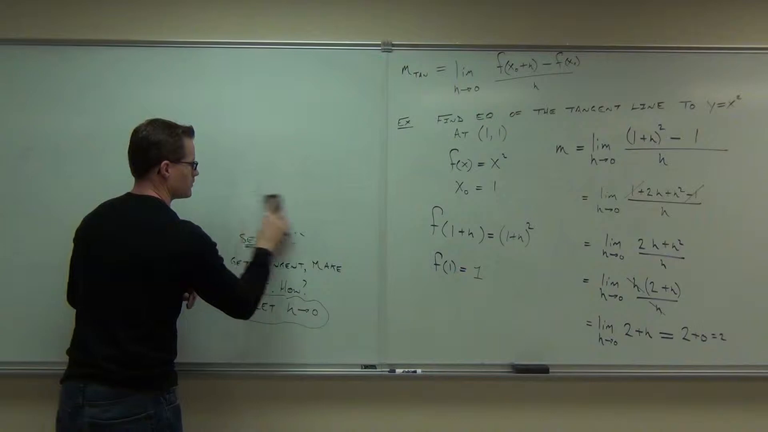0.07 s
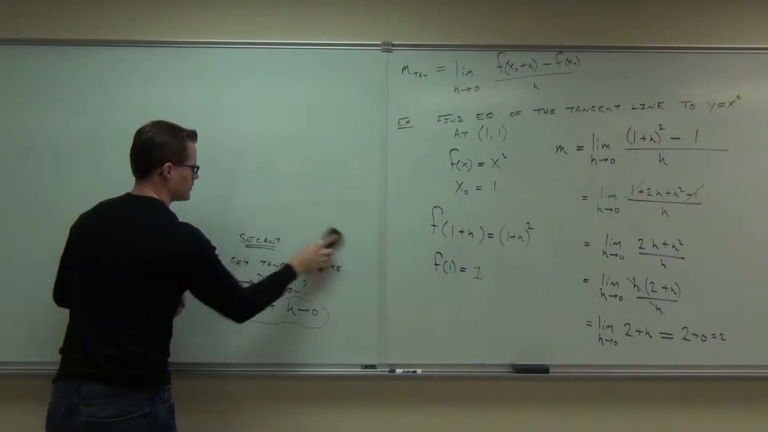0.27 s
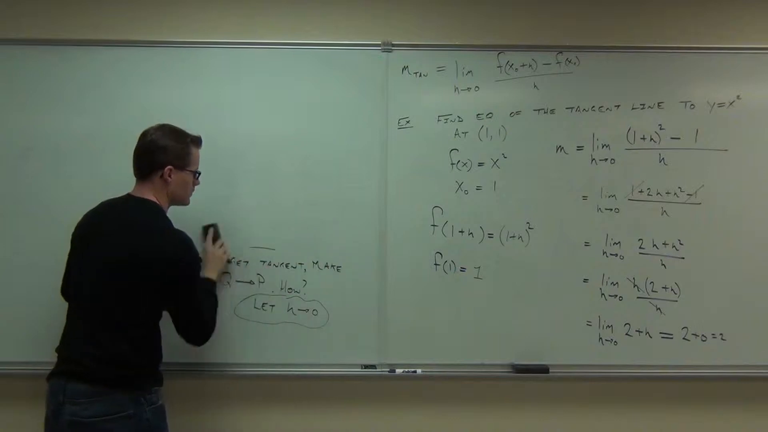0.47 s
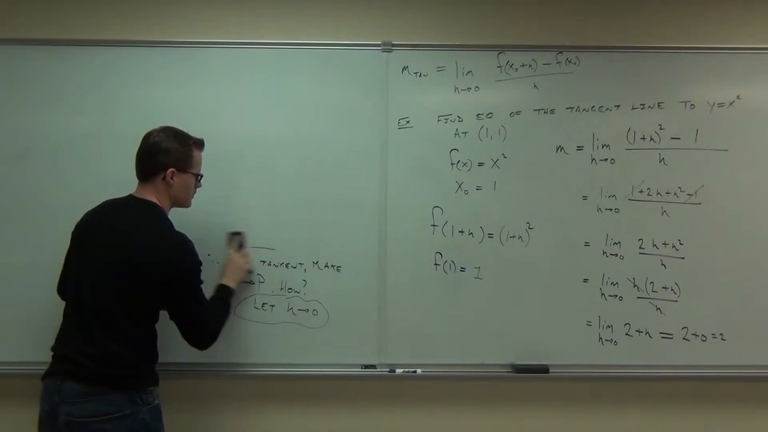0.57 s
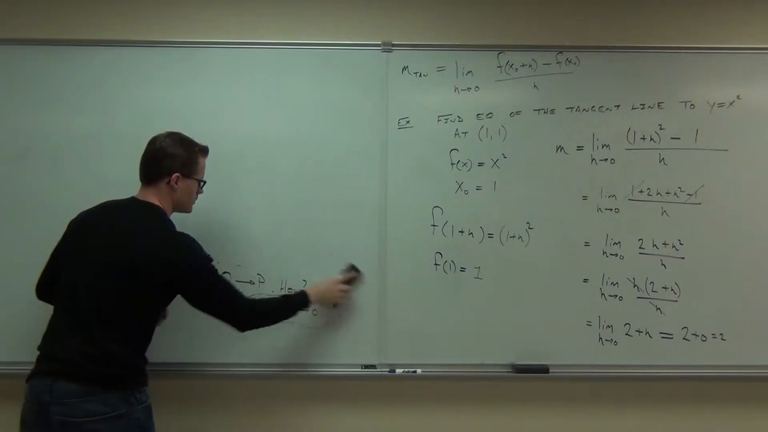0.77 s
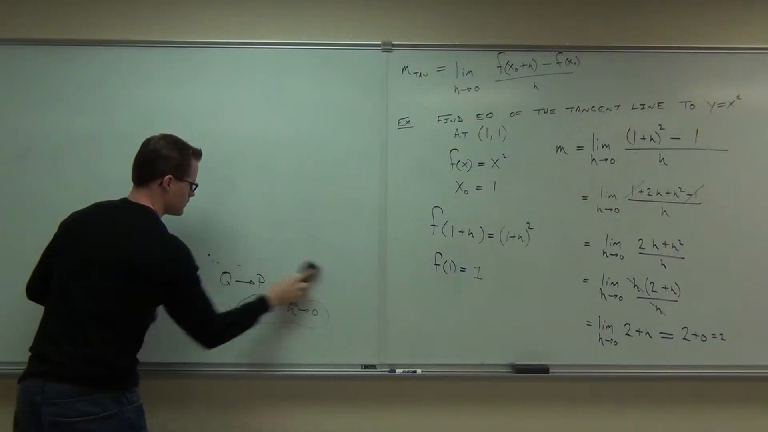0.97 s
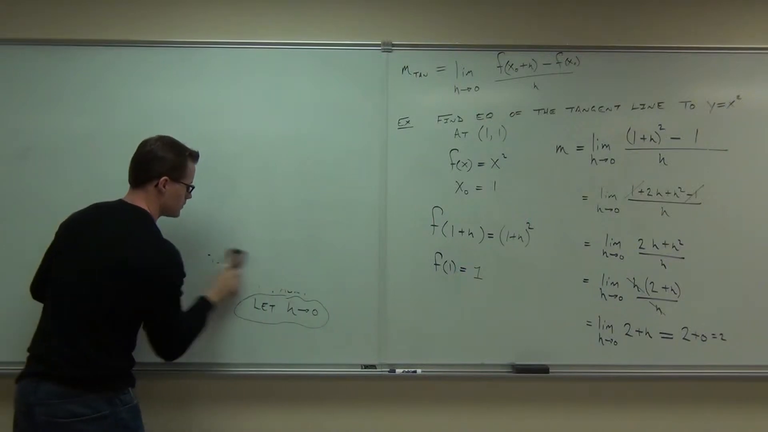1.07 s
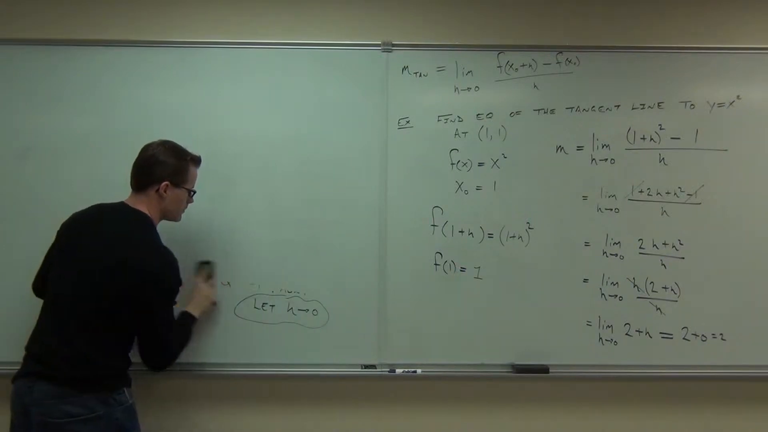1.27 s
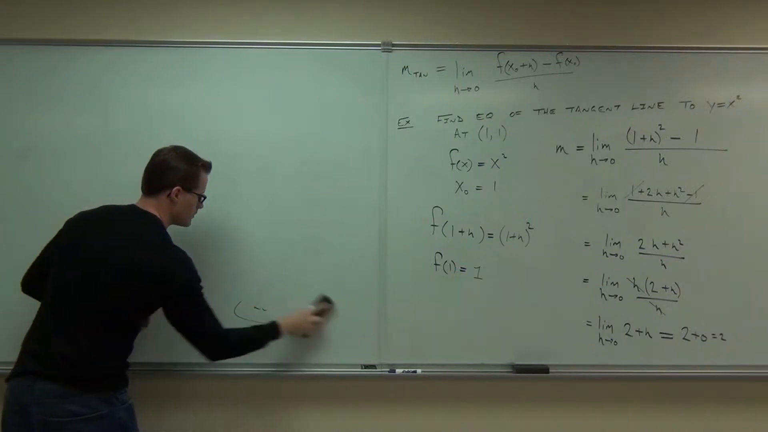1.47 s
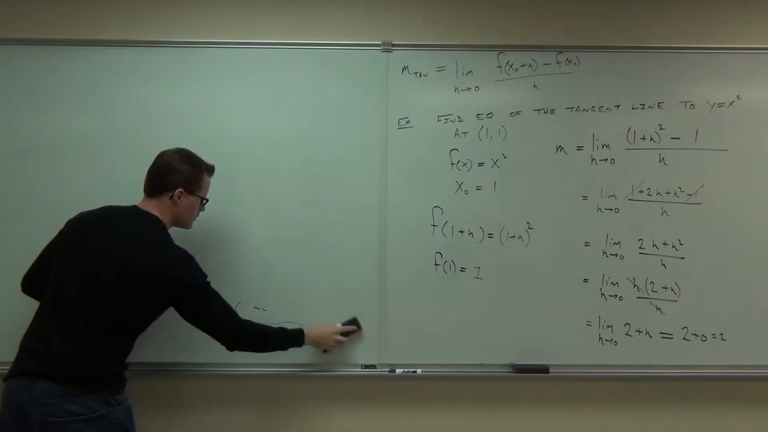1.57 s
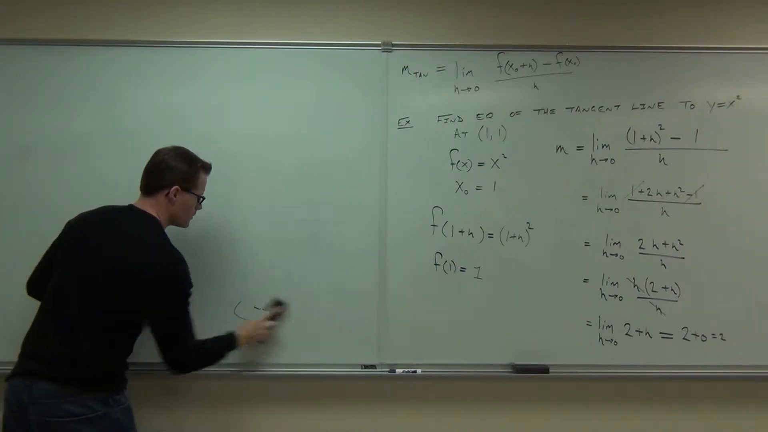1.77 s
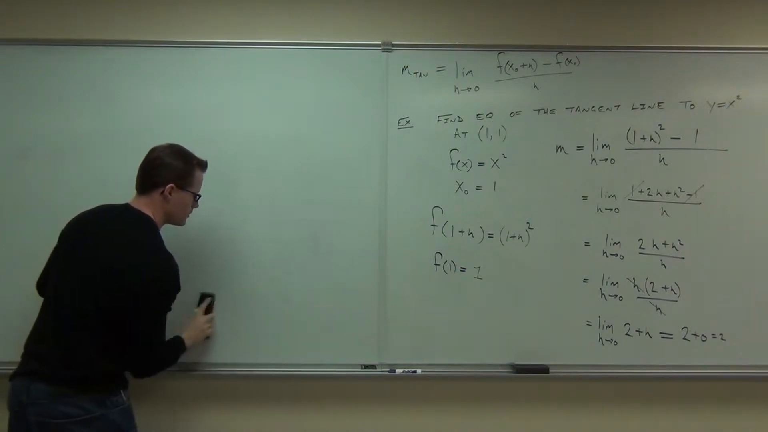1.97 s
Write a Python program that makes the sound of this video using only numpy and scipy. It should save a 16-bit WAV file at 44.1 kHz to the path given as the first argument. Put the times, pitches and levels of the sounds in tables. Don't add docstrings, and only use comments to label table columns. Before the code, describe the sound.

Out of brief silence come a low room hum and hissing whiteboard eraser strokes, with dull, faint board thuds and a small tick, then a rapid metallic clatter on the marker tray, heard across a mildly reverberant classroom.

```python
import sys
import numpy as np
from scipy import signal
from scipy.io import wavfile
from scipy.ndimage import uniform_filter1d

SR = 44100
rng = np.random.default_rng(int(sys.argv[2]) if len(sys.argv) > 2 else 0)


def digitize_waveform(pressure):
    field = np.atleast_2d(pressure).T
    bounded = np.clip(field, -1, 1)
    quanta = np.round(bounded * 32767).astype(np.int16)
    wavfile.write(sys.argv[1], SR, quanta)


def voltage_ratio(level):
    return 10 ** (np.asarray(level, float) / 20)


N = 89170

# (f/Hz, density/dB)
AIR_SPECTRUM = [(20, -33), (45, 3), (160, 5), (300, -2), (950, -9), (1150, -11.5), (9000, -20.5),
                (15800, -30)]
# (f/Hz, width/Hz, level/dB)
DUCT_HUMS = [(51, 27, -54), (86.4, 15, -59.5), (213.2, 28, -53.5), (284, 75, -62), (600, 34, -65.5),
             (922, 23, -63)]
# (t/s, level/dB)
DRONE_SWELLS = [(0.06, -63), (0.13, -41), (0.222, -56.5), (0.534, -44), (0.704, -54), (1.008, -42),
                (1.2, -48), (1.276, -41.5), (1.304, -50), (1.702, -43.5), (1.74, -51), (1.768, -86),
                (1.976, -60), (2.02, -44)]
# (f/Hz, correlation/1)
LIKENESS = [(60, .9995), (180, .998), (330, .985), (640, .9), (1500, .72), (3500, .81), (15000, .87)]
# (f/Hz, level/dB)
SIDE_LEVEL = [(150, 0), (400, .4), (1000, 1.2), (2500, 2), (15000, 2)]
# (f/Hz, phase/rad)
SIDE_PHASE = [(60, 0), (450, 0), (950, -.15), (2150, -.1), (11400, .2), (15500, .1)]
# (f/Hz, width/Hz, level/dB)
TRAY_MODES = [(673, 40, -3), (931, 35, -1), (1140, 35, -1), (1340, 45, -1), (1650, 45, -9), (1990, 65, -1),
              (2240, 45, -4), (2750, 150, -4), (3400, 300, -5)]
# (t/s, peak level/dB, struck region f/Hz, chatter/s)
TRAY_BUMPS = [(1.8925, -28.5, 1170, 0.001), (1.899, -33.5, 770, 0.008), (1.907, -41, 700, 0.0043),
              (1.933, -32, 785, 0.017), (1.945, -30.5, 1940, 0.0035), (1.951, -27.5, 980, 0.0052),
              (1.957, -29, 1380, 0.0087), (1.961, -28, 1840, 0.005), (1.966, -28, 1040, 0.0067),
              (1.969, -26.5, 940, 0.013), (1.977, -24, 1000, .005), (1.979, -26.5, 1950, 0.0053),
              (1.986, -28, 1370, .004), (1.992, -27, 1180, .008), (2.004, -28.5, 1280, 0.005),
              (2.01, -27.5, 1620, .005), (2.015, -25.5, 770, .006)]
# (t/s, level/dB, f/Hz, length/s, width/Hz)
PANEL_KNOCKS = [(0.058, -65, 2660, 0.018, 420), (0.258, -71.5, 3120, 0.014, 403),
                (0.276, -58, 600, 0.061, 150), (.71, -53.5, 385, 0.057, 149),
                (0.752, -69.5, 990, 0.0095, 304), (.755, -51, 596, 0.021, 102),
                (0.756, -64.5, 1980, 0.017, 253), (0.769, -57.5, 346, 0.026, 152),
                (0.804, -60, 330, .03, 200), (1.203, -62, 2210, 0.012, 910), (1.4, -56, 297, 0.038, 120),
                (1.643, -52, 600, 0.035, 267), (1.747, -52, 244, 0.056, 40.6), (.89, -56, 171, 0.034, 50),
                (1.62, -48, 184, 0.073, 61)]
# (t/s, peak level/dB, centre f/Hz)
TICKS = [
    (1.2045, -32, 6500),
    (1.361, -38, 3000),
    (1.8928, -33, 2000),
    (1.9305, -32, 2500),
]
# (f/Hz, width/Hz, level/dB)
PANEL_MODES = [(450, 250, -6), (800, 350, -3), (1100, 400, -3), (1700, 700, -4), (2500, 1000, -5),
               (3600, 1400, -10)]
# (middle t/s, half length/s, level/dB)
HAND_LEANS = [
    (0.345, 0.077, -70),
    (0.628, 0.052, -48),
    (0.767, 0.099, -51.5),
    (0.998, 0.14, -53),
    (1.266, 0.13, -48),
    (1.486, .12, -45.5),
    (1.676, 0.035, -61),
    (1.858, 0.18, -51.5),
]
# (start t/s, end t/s, top level/dB, place of top speed/1)
STROKES = [
    (0, 0.318, -46, 0.47),
    (0.28, 0.548, -46, 0.28),
    (0.492, 0.909, -44, 0.58),
    (0.9, 1.25, -43.5, 0.29),
    (1.222, 1.658, -40.5, 0.57),
    (1.649, 1.983, -41.5, 0.43),
    (1.948, 2.2, -46.5, 0.62),
]
# (f/Hz, density/dB)
FELT_SPECTRUM = [(880, -32), (1500, -12.5), (2410, -10), (2790, -10), (4060, -8.5), (6510, -3),
                 (11400, -1.5), (13500, -3), (15800, -12.5)]
# (t/s, f/Hz)
SHEEN_PATH = [(0, 11700), (.8, 11700), (1.1, 10900), (1.5, 10400), (2.02, 10400)]

DRONE_HZ, DRONE_WANDER_HZ, DRONE_TRIM_DB, AIR_DB = 120, 6.82, -4.5, -47
ROOM_T60_S, ROOM_DB, ROOM_MONO_HZ = .5, -5.5, 453
TRAY_DAMP, TRAY_SKIRT_HZ, TRAY_LEAN_DB = 3, 700, 2.5
REGION_DB_PER_OCT2, BUMP_RISE_S = -8.0, .0008
KNOCK_RISE_S, PANEL_LEAN_DB = 0.0013, .6
ARCH_POWER, TURN_LEVEL, TILT_DB = 0.9, .25, 4.5
HISS_PATCH_DB, SHEEN_DB, SHEEN_WIDTH_HZ = .5, 2, 3200
SHUT_S, FADE_S, FADE_POWER = 0.034, 0.04, 3.3


def evened(x):
    return x / np.sqrt(np.mean(x ** 2) + 1e-20)


def read(points, hz):
    f, value = np.transpose(points)
    return np.interp(np.log(hz + 1), np.log(f + 1), value)


def add(mix, s, sound):
    part = mix[round(s * SR):][:len(sound)]
    part += sound[:len(part)]


def resonate(x, hz, width):
    turn = np.exp(2j * np.pi * hz * np.arange(x.shape[-1]) / SR)
    r = np.exp(-np.pi * width / SR)
    return 2 * (turn * signal.lfilter([1 - r], [1, -r], x / turn)).real


def mode(x, hz, width, skirt):
    return resonate(resonate(x, hz, width), hz, skirt)


def noise(gain, size, patchy_db):
    hop = size // 4
    frames, hz = N // hop + 5, np.fft.rfftfreq(size, 1 / SR)
    a, b, c, d, patch = rng.standard_normal((frames, len(hz), 5)).T
    patch = uniform_filter1d(patch, size // 80, 0)
    patch = evened(uniform_filter1d(patch, 3000 // hop, 1))
    same = read(LIKENESS, hz)[:, None]
    left, other = a + 1j * b, c + 1j * d
    side = (voltage_ratio(read(SIDE_LEVEL, hz) / 2) * np.exp(.5j * read(SIDE_PHASE, hz)))[:, None]
    z = np.array([left * side, (same * left + np.sqrt(1 - same ** 2) * other) / side])
    z = z * voltage_ratio(patchy_db * patch) * gain(hz[:, None], np.arange(frames) * hop / SR)
    return signal.istft(z, nperseg=size, noverlap=size - hop)[1][:, :N]


def ventilation():
    air = noise(lambda hz, t: voltage_ratio(read(AIR_SPECTRUM, hz)), size=2048, patchy_db=-1.1)
    white = rng.standard_normal((len(DUCT_HUMS) + 1, N))
    hum = sum(voltage_ratio(db) * evened(mode(x, hz, w, 3 * w)) for x, (hz, w, db) in zip(white, DUCT_HUMS))
    wander = uniform_filter1d(uniform_filter1d(white[-1], 1500), 1500)
    drone_hz = DRONE_HZ + DRONE_WANDER_HZ * evened(wander)
    level = voltage_ratio(np.interp(np.arange(N) / SR, *np.transpose(DRONE_SWELLS)) + DRONE_TRIM_DB)
    drone = level * np.sqrt(2) * np.sin(2 * np.pi * np.cumsum(drone_hz) / SR)
    return voltage_ratio(AIR_DB) * evened(air) + hum + drone


def classroom(x):
    length = SR // 2
    taps = np.zeros((2, length))
    at = np.arange(200, length - 20, 20) + rng.integers(0, 20, (2, (length - 201) // 20))
    np.put_along_axis(taps, at, rng.choice([-1., 1.], at.shape), 1)
    taps = taps * voltage_ratio(-60 * np.arange(length) / SR / ROOM_T60_S)
    return voltage_ratio(ROOM_DB) * signal.fftconvolve(x[None], taps / np.linalg.norm(taps[0]), axes=1)[:, :N]


def tray():
    out, t = np.zeros(N), np.arange(5000) / SR
    for (s, db, region_hz, length), x in zip(TRAY_BUMPS, rng.standard_normal((len(TRAY_BUMPS), 5000))):
        drive = x * np.exp(-t / length) * np.minimum(t / BUMP_RISE_S, 1)
        ring = 0
        for hz, w, mode_db in TRAY_MODES:
            coupling_db = mode_db + REGION_DB_PER_OCT2 * np.log2(hz / region_hz) ** 2
            ring = ring + voltage_ratio(coupling_db) / np.sqrt(w) * mode(drive, hz, TRAY_DAMP * w, TRAY_SKIRT_HZ)
        add(out, s, voltage_ratio(db) * ring / np.abs(ring).max())
    return out


def knocks():
    out, t = np.zeros(N), np.arange(4000) / SR
    for (s, db, hz, length, w), x in zip(PANEL_KNOCKS, rng.standard_normal((len(PANEL_KNOCKS), 4000))):
        drive = x * np.minimum(t / KNOCK_RISE_S, 1) * np.exp(-(t / length) ** 4)
        ring = evened(mode(drive, hz, w, 2 * w))
        add(out, s, voltage_ratio(db) * ring * np.sqrt(len(t) / SR / length))
    for s, db, hz in TICKS:
        cycles = t[:300] * hz
        add(out, s, voltage_ratio(db) * 16 * cycles * np.exp(-3.0 * cycles) * np.sin(2 * np.pi * cycles))
    return out


def speed(t):
    out = np.zeros(len(t))
    for start, end, db, top in STROKES:
        skew = np.log(.5) / np.log(np.clip(top, .1, .9))
        u = np.clip((t - start) / (end - start), 0, 1) ** skew
        out += voltage_ratio(db) * np.abs(np.sin(np.pi * u)) ** ARCH_POWER * ((t >= start) & (t < end))
    return out + TURN_LEVEL * voltage_ratio(-38)


def felt_gain(hz, t):
    sheen = SHEEN_DB * np.exp(-((hz - np.interp(t, *np.transpose(SHEEN_PATH))) / SHEEN_WIDTH_HZ) ** 2)
    tilt = TILT_DB * np.log2(speed(t) / voltage_ratio(-41.5)) * np.log2((hz + 1) / 9000)
    return voltage_ratio(read(FELT_SPECTRUM, hz) - 31 * (hz < 900) + sheen + tilt)


def eraser():
    t = np.arange(N) / SR
    hiss = noise(felt_gain, size=256, patchy_db=HISS_PATCH_DB)
    grit = 1 + .06 * evened(uniform_filter1d(rng.standard_normal(N), 90))
    white = noise(lambda hz, t: 1, size=256, patchy_db=2.0)
    panel = sum(voltage_ratio(db) * mode(white, hz, w, 2 * w) * np.sqrt(300 / w) for hz, w, db in PANEL_MODES)
    pressure = sum(voltage_ratio(db) * np.exp(-((t - s) / half) ** 2) for s, half, db in HAND_LEANS)
    return speed(t) * grit * evened(hiss) + pressure * evened(panel)


def scene():
    panel, metal = knocks(), tray()
    near = panel * voltage_ratio([[PANEL_LEAN_DB], [-PANEL_LEAN_DB]]) + metal * voltage_ratio([[TRAY_LEAN_DB], [-TRAY_LEAN_DB]])
    room = classroom(panel + metal)
    middle = room.mean(0)
    highpass = signal.butter(2, ROOM_MONO_HZ, "high", fs=SR, output="sos")
    side = signal.sosfilt(highpass, room - middle)
    return ventilation() + eraser() + near + middle + side


def roll_off(x):
    return signal.sosfilt(signal.butter(12, 15940, fs=SR, output="sos"), x)


def record(dry):
    rise = np.clip((np.arange(N) / SR - SHUT_S) / FADE_S, 0, 1)
    fade = np.sin(np.pi / 2 * rise) ** FADE_POWER
    return roll_off(dry * fade)


dry = scene()
out = record(dry)
digitize_waveform(out)
```